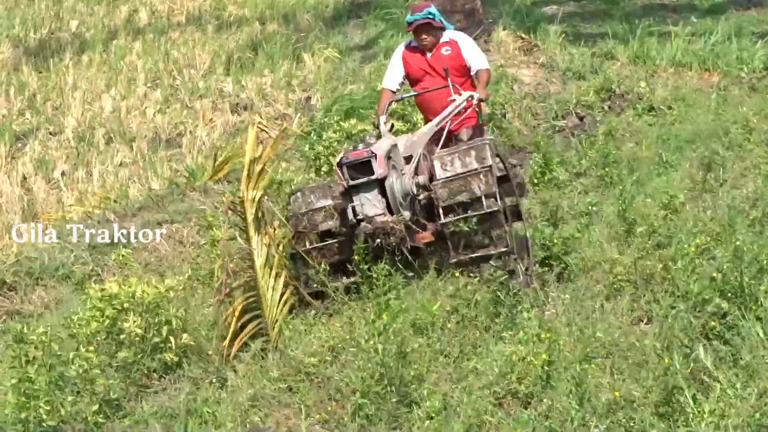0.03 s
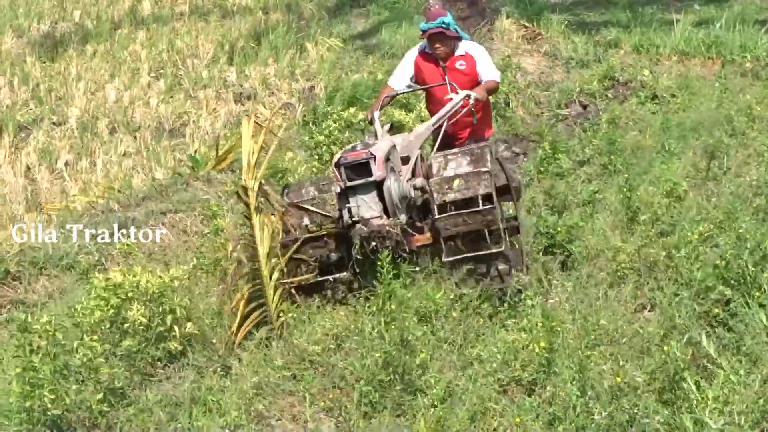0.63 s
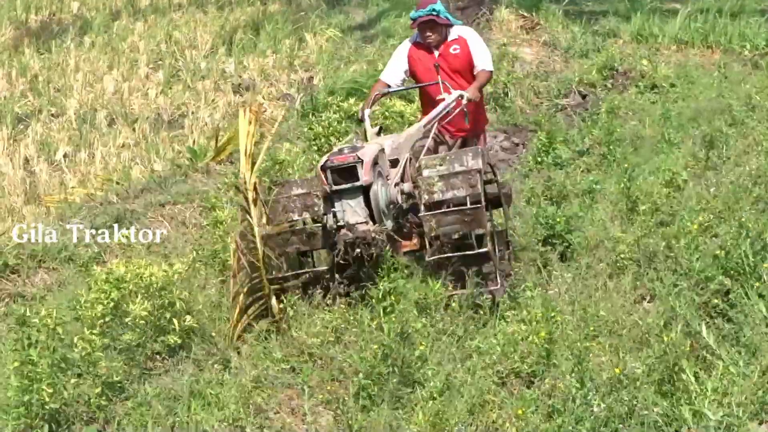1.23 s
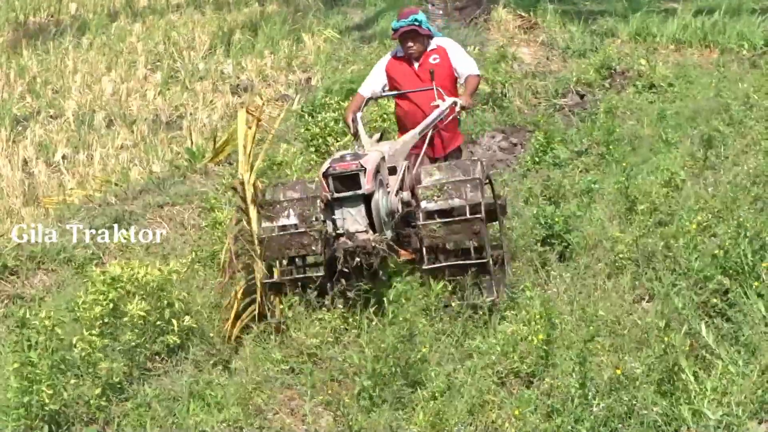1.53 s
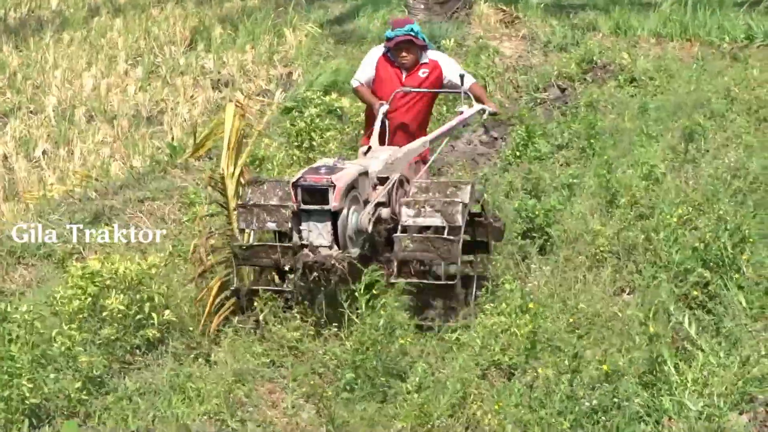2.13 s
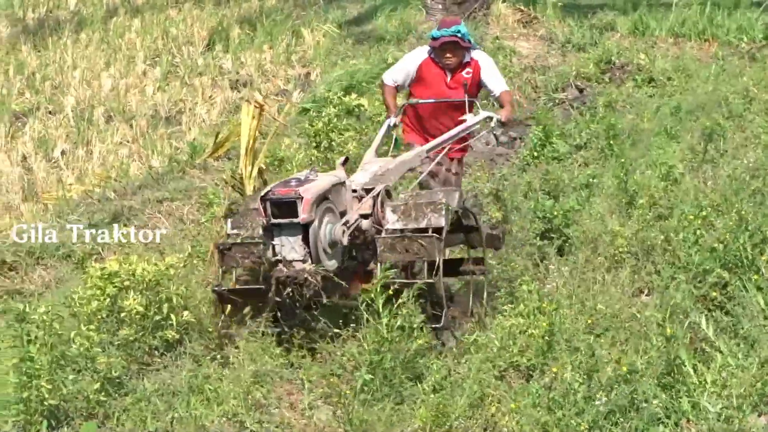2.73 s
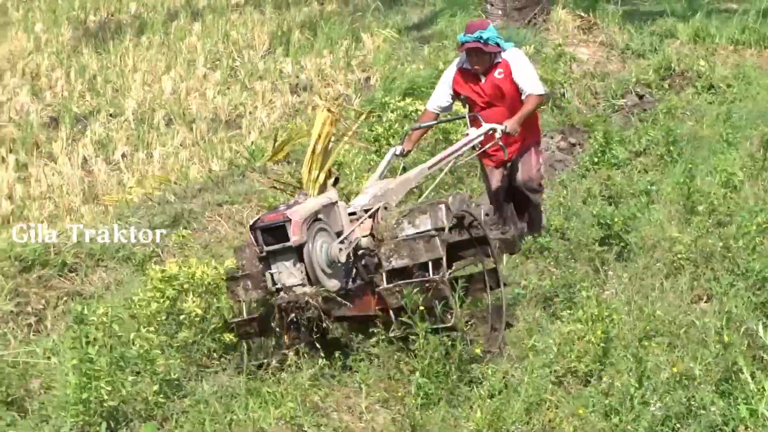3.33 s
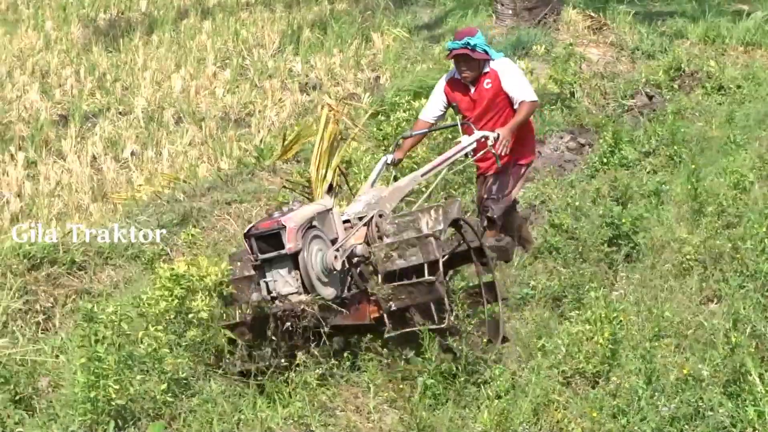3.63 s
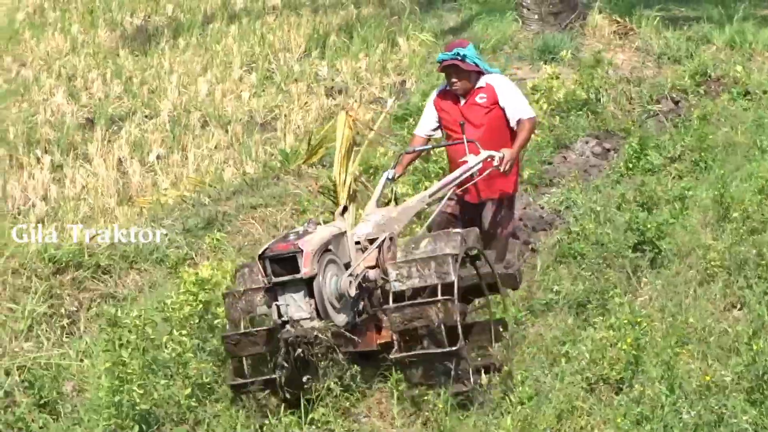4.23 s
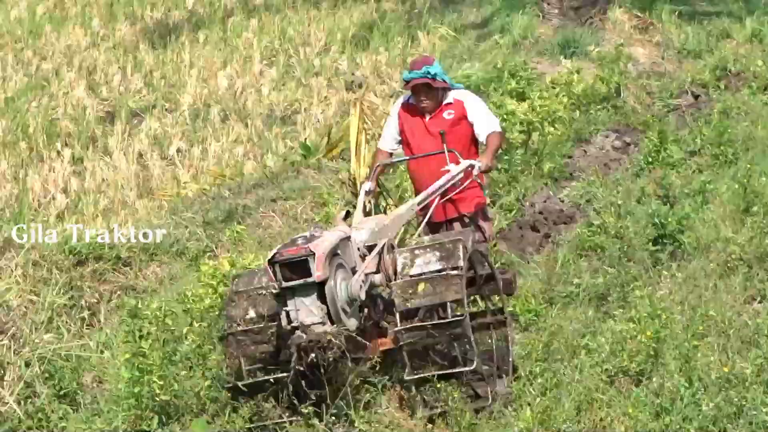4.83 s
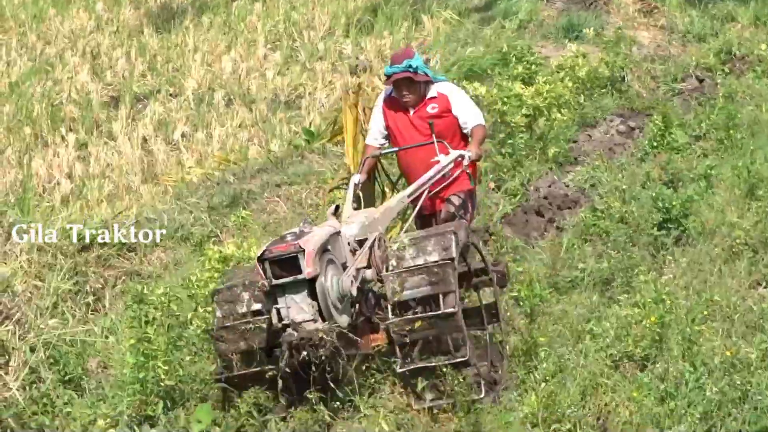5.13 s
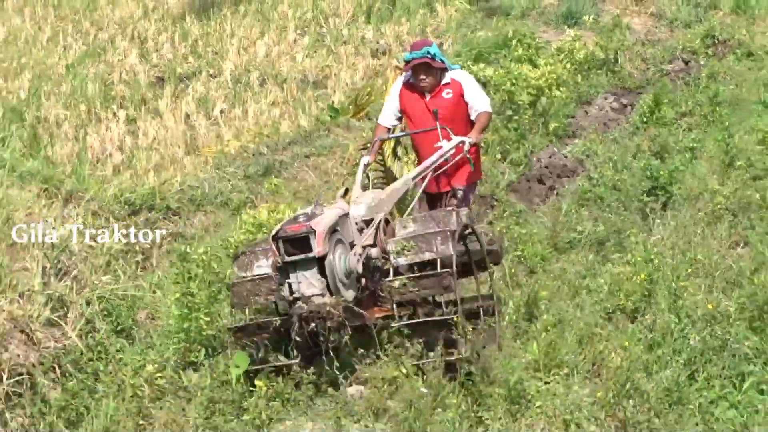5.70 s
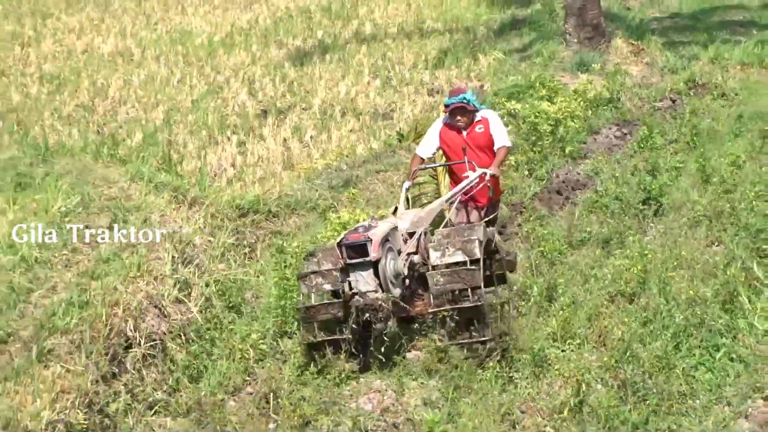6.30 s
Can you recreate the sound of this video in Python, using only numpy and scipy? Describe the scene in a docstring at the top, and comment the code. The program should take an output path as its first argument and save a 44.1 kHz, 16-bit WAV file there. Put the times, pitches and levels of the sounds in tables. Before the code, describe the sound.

Wind buffets the microphone in an open field as a small diesel walking tractor knocks along with metallic clatter and faint hiss.

```python
"""A single-cylinder diesel chugs, about eight firings a second: a hand tractor ploughing a dry field.
Each firing knocks the engine block hard, and piston and valves clatter more softly in between.
Behind the engine, fan, belt and crushed grass hiss, and the gears keep the metal faintly ringing.
Gusts of wind heave, rumble and flutter on the two ports of the microphone."""
import sys
import numpy as np
from scipy import signal
from scipy.fft import rfft, irfft, next_fast_len
from scipy.io import wavfile
from scipy.ndimage import uniform_filter1d, minimum_filter1d

SR = 44100
rng = np.random.default_rng(int(sys.argv[2]) if len(sys.argv) > 2 else 0)


def dump(signal):
    """Clip the signal to [-1, 1] and save it as 16-bit WAV at the path in sys.argv[1]."""
    limited = np.clip(np.atleast_2d(signal).T, -1, 1)
    pcm = np.round(limited * 32767).astype(np.int16)
    wavfile.write(sys.argv[1], SR, pcm)


N = 280476


def from_db(db):
    """Decibels to gain."""
    return 10 ** (np.asarray(db) / 20)


def unit(x):
    """Scales to rms 1."""
    return x / np.sqrt(np.mean(x ** 2) + 1e-20)


def curve(points, s):
    """Reads a table at times s."""
    return np.interp(s, *np.transpose(points))


def along(points, hz):
    """Reads a table on a log-frequency axis."""
    f, value = np.transpose(points)
    return np.interp(np.log(hz + 1), np.log(f + 1), value)


def bins(x):
    """Frequencies of the spectrum of x."""
    return np.fft.rfftfreq(x.shape[-1], 1 / SR)


def band_rms(x, lo_hz, hi_hz):
    """Rms of the part of x inside a band."""
    hz = bins(x)
    band = rfft(x)[(hz > lo_hz) & (hz < hi_hz)]
    return np.sqrt(2 * np.sum(abs(band) ** 2) + 1e-20) / len(x)


def add(mix, s, sound):
    """Lays a sound into the mix at time s."""
    start = round(s * SR)
    sound = sound[max(-start, 0):]
    part = mix[max(start, 0):][:len(sound)]
    part += sound[:len(part)]


def wander(rate_hz):
    """Smooth random motion of rms 1, rolling off above rate_hz."""
    step = 64
    x = rng.standard_normal(next_fast_len(N // step + 2))
    slow = unit(irfft(rfft(x) * np.exp(-(bins(x) / step / rate_hz) ** 2), len(x)))
    return np.interp(np.arange(N) / step, np.arange(len(x)), slow)


def noise_pair(spectrum, likeness):
    """Coloured noise in two channels whose correlation is likeness."""
    white = rng.standard_normal((2, N))
    left, other = rfft(white)
    alike = np.clip(likeness, -.99, .99)
    right = alike * left + np.sqrt(1 - alike ** 2) * other
    return irfft(np.array([left, right]) * from_db(along(spectrum, bins(white))), N)


def eddies(spectrum, likeness, left_db, flicker_db, rate_hz):
    """Turbulence at the two ports, its strength flickering quickly about an even mean."""
    pair = noise_pair(spectrum, likeness) * from_db([[left_db / 2], [-left_db / 2]])
    pair *= from_db(flicker_db * wander(rate_hz))
    return pair / np.sqrt(uniform_filter1d(pair.mean(0) ** 2, size=8000))


def puffs(rows, t, floor_db):
    """Gain of a background flow on which each puff swells and dies in a bell shape."""
    power = sum(from_db(db) ** 2 * np.exp(-((t - s) / half_s) ** 2) for s, half_s, db in rows)
    return np.sqrt(from_db(floor_db) ** 2 + power)


def wind():
    """Big eddies heave and rumble, mostly on the left; gusts flutter higher, pushing the ports in turn."""
    # Tone of the three wind layers. Each row: frequency in Hz, relative noise density in dB.
    heave_tone = [(8, -23), (22, -18), (45, 10), (58, -0.5), (80, 1), (160, -68), (400, -80)]
    rumble_tone = [(20, -32), (42, -17), (60, -2), (85, 2), (130, -3.5), (200, -14), (350, -35), (800, -68)]
    flutter_tone = [(40, -36), (110, 0), (200, 4), (310, 1), (450, -6.5), (700, -15.5), (1200, -26),
                    (3000, -38.5), (9000, -76)]
    # Deep buffets and lighter gusts. Each row: peak time in seconds, half-length in seconds, level in dB.
    buffets = [(.51, 0.045, -32), (1.93, .07, -29), (2.23, 0.092, -29), (2.94, 0.064, -19.5),
               (3.66, 0.06, -19.5), (5.29, 0.068, -25), (5.68, .05, -27), (6.14, 0.085, -25.5)]
    gusts = [(.19, 0.14, -20.5), (.61, 0.047, -25.5), (.97, 0.078, -29.5), (1.25, 0.038, -23.5),
             (1.7, 0.12, -22.5), (2.0, 0.023, -28), (3.13, .14, -34), (3.67, .04, -19.5),
             (4.3, 0.064, -30.5), (4.59, 0.073, -24), (4.89, 0.12, -28)]
    # Faders for the rumble and the breeze between gusts. Each row: time in seconds, relative level in dB.
    rumble_level = [(0.0, -20.5), (0.38, -28.5), (0.48, -19.5), (0.7, -25.5), (0.82, -19), (2.04, -19.5),
                    (2.16, -29.5), (2.52, -30.5), (2.8, -22.5), (2.88, -33), (2.96, -19.5), (3.38, -26),
                    (3.54, -20.5), (4.58, -20.5), (4.66, -24), (5.24, -20.5), (5.66, -31), (5.72, -22.5),
                    (6.24, -27.5), (6.34, -17.5)]
    breeze_level = [(0, -31), (1.9, -33.5), (2.15, -38.5), (2.5, -40.5), (2.8, -34), (4.1, -33.5),
                    (5.3, -33.5), (6.36, -35.5)]
    swell_db, swell_hz = 1.25, 10.5  # the wind's own unsteadiness
    t = np.arange(N) / SR
    heave = eddies(heave_tone, likeness=0.92, left_db=4.4, flicker_db=0.65, rate_hz=8.3)
    heave *= puffs(buffets, t, floor_db=-34.5)
    rumble = eddies(rumble_tone, likeness=0.6, left_db=8.9, flicker_db=2.75, rate_hz=18)
    rumble *= from_db(curve(rumble_level, t) + swell_db * wander(swell_hz) - 3.5)
    flutter = eddies(flutter_tone, likeness=-0.44, left_db=0.81, flicker_db=2.0, rate_hz=59)
    flutter *= puffs(gusts, t, floor_db=curve(breeze_level, t))
    flutter *= from_db(swell_db * wander(swell_hz))
    return heave + rumble + flutter


def mode(hz, centre_hz, width_hz):
    """Response of one damped resonance, gain 1 at its centre."""
    return 1j * hz * width_hz / (centre_hz ** 2 - hz ** 2 + 1j * hz * width_hz)


def block(hz):
    """Response of the engine's metal to a blow: a sum of modes of alternating polarity."""
    # Modes of the block and its covers. Each row: frequency in Hz, width in Hz, gain in dB.
    modes = [(753, 85, 6), (1097, 63, 6.5), (1230, 64, 7), (1475, 220, 2.5), (1860, 62, 6),
             (2070, 220, 2.5), (2790, 132, 9), (3040, 130, 1), (3550, 400, -0.5), (4120, 360, 0.5),
             (4320, 255, 0.5), (4850, 150, -6), (5610, 340, -0.5), (6620, 540, -3)]
    return sum((-1) ** k * from_db(db) * mode(hz, f, width) for k, (f, width, db) in enumerate(modes))


def impacts(t, rise_s, decay_s, grain_db):
    """A blow as a quick volley of tiny uneven impacts, its envelope peaking at t = 0."""
    push, size = rng.standard_normal((2, len(t)))
    return push * from_db(grain_db * size) * np.exp(np.minimum(t / rise_s, -t / decay_s))


def hiss():
    """Fan, belt and crushed grass hiss, while the gears keep the block faintly ringing."""
    # Tone of the hiss. Each row: frequency in Hz, relative noise density in dB.
    hiss_tone = [(300, 7.5), (560, -6), (780, 7.5), (1000, 2), (1400, 1.5), (2300, -2.5), (3300, 0),
                 (4200, 0.5), (6200, 2), (7100, -2), (8150, -10), (9300, -6.5), (10500, -2.5),
                 (11200, -11.5)]
    # Its stereo image. Each row: frequency in Hz, correlation between left and right.
    likeness = [(300, 0.96), (800, 1), (2400, 0.65), (4500, 0.83), (7000, 0.99), (8300, 0.6), (9500, 0.55),
                (10800, .75)]
    # The hiss drops abruptly at times and creeps back. Each row: time in seconds, relative level in dB.
    hiss_level = [(0, -48), (.4, -45.5), (1.15, -41), (1.22, -44.5), (2.0, -41.5), (2.75, -38), (3.33, -36),
                  (3.42, -35), (3.67, -34), (3.73, -41.5), (3.85, -40), (4.01, -43.5), (4.13, -41.5),
                  (4.45, -43), (4.48, -42.5), (4.53, -42), (5.2, -38.5), (5.85, -36.5), (6.36, -35.5)]
    t = np.arange(N) / SR
    hz = bins(t)
    air = noise_pair(hiss_tone, along(likeness, hz))
    air = air / band_rms(air.mean(0), 4650, 8600) * from_db(1.1 * wander(110))
    grit = impacts(np.zeros(N), 1, 1, grain_db=10.7)  # held at its peak: an unbroken volley
    gears = unit(irfft(rfft(grit) * block(hz), N)) * from_db(-10.2 + 2.0 * wander(60))
    return (air + gears) * from_db(curve(hiss_level, t) + 0.63 + 0.86 * wander(13))


def crank_times(share):
    """Times at which the four-stroke cycle, two turns long, is this share past its firing."""
    # The crank sags when the plough bites and the governor catches it again.
    # Each row: time in seconds, speed in rpm.
    speed = [(0.0, 907.6), (0.6, 974.1), (0.95, 935.6), (1.65, 956.0), (1.85, 940.3), (2.0, 985.9),
             (2.55, 916.9), (3.9, 990.0), (4.45, 896.4), (4.65, 976.1), (5.0, 920.4), (5.55, 906.9),
             (5.7, 961.6), (5.85, 898.3), (6.0, 989.5), (6.36, 891.0)]
    first_firing = .738  # share of a cycle that passes before it
    t = np.arange(N) / SR
    cycles = np.cumsum(curve(speed, t) / 60 / 2) / SR - first_firing - share
    return t[1:][np.diff(np.floor(cycles)) > 0]


def clatter():
    """Piston and valve gear strike the block at set crank angles, with some play."""
    # In order: piston slap, a valve's clink, a timing-gear tick, the other valve, the intake chuff,
    # and the piston tilting back as compression builds. Each row: share of the cycle after firing,
    # relative level in dB, decay in seconds, centre of the force in Hz, its spread in octaves.
    blows = [(.244, 1, 0.0067, 1790, 1.23), (.257, -14.5, 0.0068, 2840, 0.052),
             (.53, -16.5, .003, 1390, 0.88), (.742, -4, .0055, 2920, 0.058),
             (.752, -0.5, 0.0075, 1460, 0.56), (.83, -1.5, 0.0091, 1360, 0.49)]
    # The clatter swells, drops abruptly near 3.7 s and creeps back.
    # Each row: time in seconds, relative level in dB.
    clatter_level = [(0, -58), (1.0, -48), (2.1, -50), (2.7, -40.5), (3.5, -38), (3.66, -36.5),
                     (3.75, -44.5), (4.3, -49.5), (5.2, -40.5), (5.5, -46.5), (5.9, -39.5), (6.36, -40.5)]
    play_db, play_s = 2.4, .0013  # scatter from blow to blow
    out = np.zeros(N)
    t = np.arange(4096) / SR - .006
    hz = bins(t)
    metal = block(hz)
    for share, db, decay_s, centre_hz, octaves in blows:
        # each part reaches mainly the modes around its own centre
        contact = 1 / (1 + (np.log2((hz + 1) / centre_hz) / (2 * octaves)) ** 2) ** 2
        for s in crank_times(share):
            late, strength = rng.standard_normal(2)
            force = impacts(t, rise_s=0.0014, decay_s=decay_s, grain_db=2.5)
            blow = unit(irfft(rfft(force) * metal * contact))
            level_db = curve(clatter_level, s) + db + play_db * strength
            add(out, s + play_s * late + t[0], from_db(level_db) * blow)
    return out


def knocks():
    """Combustion jolts the block; the gas in the chamber rings, a little differently each time."""
    # The knock grows louder and softer, at times dropping abruptly.
    # Each row: time in seconds, relative level in dB.
    knock_level = [(.1, -40), (.35, -31), (.48, -36.5), (.6, -29.5), (.98, -37.5), (1.11, -32),
                   (1.8, -33.5), (1.99, -28.5), (2.4, -42), (2.63, -25), (3.25, -27.5), (3.6, -21),
                   (3.76, -30), (3.88, -30), (4.0, -48), (4.26, -31), (5.16, -30), (5.29, -24.5),
                   (6.1, -22.5), (6.32, -32.5)]
    ring_hz, scatter_hz, scatter_db = 4117, 170, 1
    out = np.zeros(N)
    t = np.arange(2048) / SR - .006
    hz = bins(t)
    metal = block(hz)
    for s in crank_times(0):
        strength, detune = rng.standard_normal(2)
        level_db = curve(knock_level, s) + scatter_db * strength
        chamber = mode(hz, ring_hz + scatter_hz * detune, width_hz=940) ** 2
        # the piston rocks and strikes the liner again a few milliseconds later
        rebound_gain, rebound_s = rng.uniform(0.31, 0.52), rng.uniform(0.0012, 0.0034)
        rebound = rebound_gain * impacts(t - rebound_s, rise_s=0.00039, decay_s=0.0022, grain_db=1.2)
        firing = impacts(t + 0.0014, rise_s=0.0021, decay_s=0.0017, grain_db=2)
        ping = unit(irfft(rfft(firing + rebound) * metal * chamber))
        jolt = impacts(t + 0.00091, rise_s=0.0017, decay_s=0.0021, grain_db=2.1)
        body = unit(irfft(rfft(jolt) * metal))
        snap = impacts(t + 0.00054, rise_s=0.00091, decay_s=0.0024, grain_db=3.2)
        crack = unit(irfft(rfft(snap) * mode(hz, 3500, width_hz=4000)))
        knock = from_db(-8.0) * ping + from_db(-10.0) * body + from_db(-18.5) * crack
        add(out, s + t[0], from_db(level_db) * knock)
    return out


def field(x):
    """Ground and plants scatter a short, weak stereo tail."""
    echoes_per_s, gap_s, rt60_s = 2000, .003, 0.12
    t = np.arange(8192) / SR
    taps = rng.standard_normal((2, len(t)))
    taps *= (rng.random((2, len(t))) < echoes_per_s / SR) & (t > gap_s)
    tail = taps * from_db(-60 * t / rt60_s)
    tail /= np.linalg.norm(tail[0])
    return x + from_db(-6.0) * signal.fftconvolve(x[None], tail, axes=1)[:, :N]


def stereo_shift(x):
    """The tractor reaches the two channels with a shift of phase and level that varies with frequency."""
    # Phase between the channels. Each row: frequency in Hz, lead of the left in radians.
    lead = [(50, 7.8), (520, 0.5), (780, 1.3), (1500, 1.04), (2300, 0.51), (4300, .2), (7000, 0.39),
            (8300, 1.8), (9200, 0.88), (11000, 0.2)]
    # Balance between the channels. Each row: frequency in Hz, left over right in dB.
    balance = [(100, -2), (630, 2), (1130, -3.5), (3600, -1.5), (6500, 0.5), (10000, -4)]
    hz = bins(x)
    half_shift = from_db(along(balance, hz) / 2) * np.exp(.5j * along(lead, hz))
    return irfft(rfft(x) * np.array([half_shift, 1 / half_shift]), N)


def scene():
    """The tractor in the open field, and wind at the microphone."""
    tractor = field(knocks() + clatter()) + hiss()
    return stereo_shift(tractor) + wind()


def record(dry):
    """A limiter holds the strongest gusts under a ceiling; a steep low-pass cuts the top end."""
    ceiling, edge_hz = .5, 11150
    gain = np.minimum(1, ceiling / (abs(dry).max(0) + 1e-9))
    held = dry * uniform_filter1d(minimum_filter1d(gain, size=301), size=301)
    low_pass = signal.firwin(601, edge_hz, window=("kaiser", 9), fs=SR)
    return signal.oaconvolve(held, low_pass[None], "same")


dry = scene()
out = record(dry)
dump(out)
```